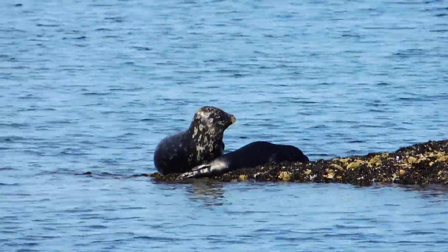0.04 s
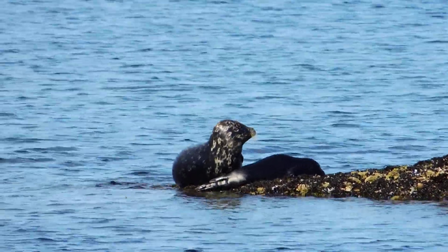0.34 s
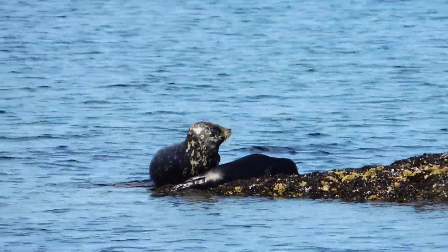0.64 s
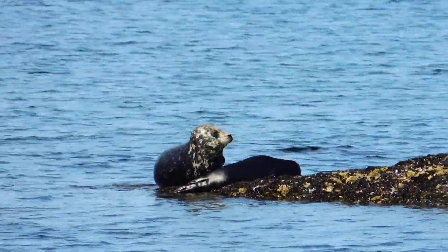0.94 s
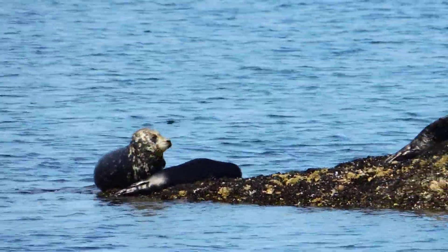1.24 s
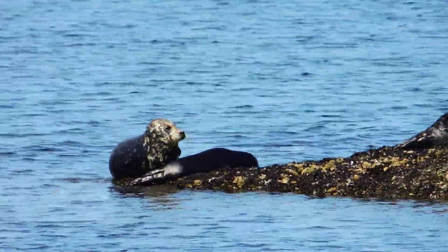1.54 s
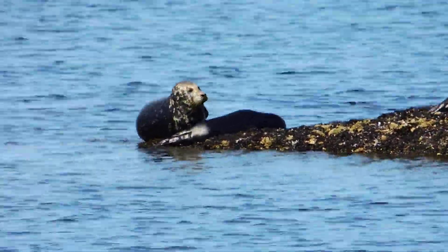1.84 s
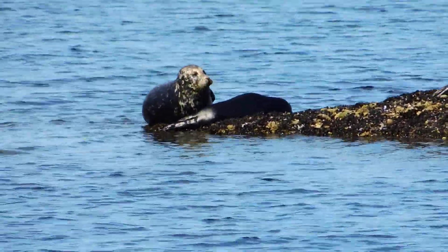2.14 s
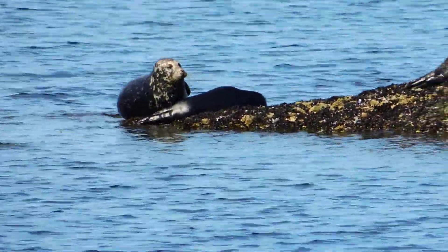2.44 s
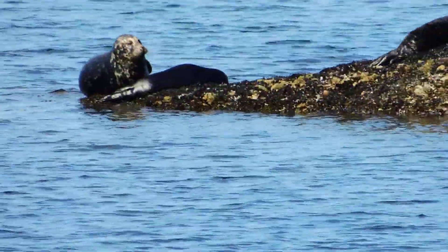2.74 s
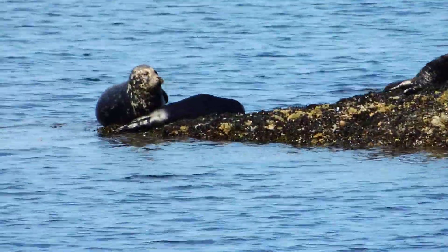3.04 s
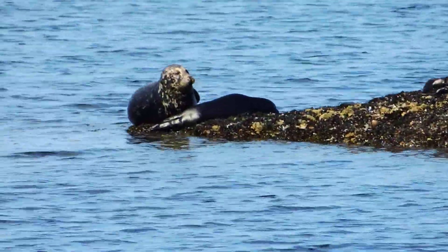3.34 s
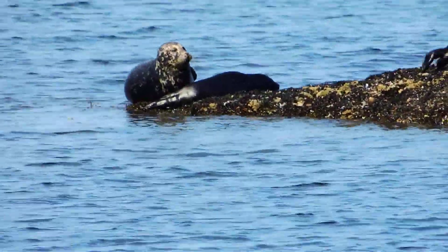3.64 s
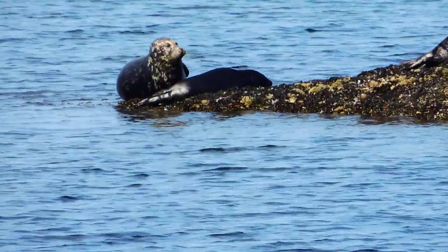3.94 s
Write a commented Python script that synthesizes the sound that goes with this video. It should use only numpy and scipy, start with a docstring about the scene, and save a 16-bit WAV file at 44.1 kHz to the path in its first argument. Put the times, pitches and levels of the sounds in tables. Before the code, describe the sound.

Gusty wind rumbles and thumps against the microphone on a rocky shore, mostly on the right side, easing briefly early on and then picking up. Faint high cricket chirps and a soft wash of water continue behind it.

```python
"""Gusty wind buffeting a camera's microphone ports on a calm rocky shore.
Eddies hit the exposed right port hard, the sheltered left one lightly; the stronger the gust,
the smaller its eddies and the higher the rumble reaches. Behind it: a faint wash of ripples,
two small splashes, crickets chirping in short wing strokes, and microphone hiss."""
import sys
import numpy as np
from scipy import signal
from scipy.fft import rfft, irfft, next_fast_len
from scipy.io import wavfile
from scipy.ndimage import uniform_filter1d, map_coordinates

SR = 44100
rng = np.random.default_rng(int(sys.argv[2]) if len(sys.argv) > 2 else 0)


def int16_out(signal):
    """Quantize to a 16-bit WAV file."""
    q = np.round(np.clip(np.atleast_2d(signal).T, -1, 1) * 32767)
    wavfile.write(sys.argv[1], SR, q.astype(np.int16))


N = 176400


def amp(db):
    """Decibels to gain."""
    return 10 ** (np.asarray(db) / 20)


def unit(x):
    """Scale to rms 1."""
    return x / np.sqrt(np.mean(x ** 2) + 1e-20)


def curve(rows):
    """(time [s], value) rows to one value per sample."""
    return np.interp(np.arange(N) / SR, *np.transpose(rows))


def wobble(knots_per_s):
    """Smooth random curve."""
    return map_coordinates(rng.standard_normal(8192), [np.arange(N) * knots_per_s / SR], mode="wrap")


def filtered(x, response):
    """Apply a gain given as a function of frequency [Hz]."""
    size = next_fast_len(N + 8192)
    return irfft(rfft(x, size) * response(np.fft.rfftfreq(size, 1 / SR)), size)[..., :N]


def coloured(x, spectrum):
    """Shape by (frequency [Hz], gain [dB]) rows; rms 1."""
    knots_hz, db = np.transpose(spectrum)
    return unit(filtered(x, lambda hz: amp(np.interp(np.log(hz + 1), np.log(knots_hz + 1), db))))


def noise_band(shape, centre_hz, sigma_oct):
    """Noise in a bell-shaped band; rms 1."""
    noise = rng.standard_normal(shape)
    return unit(filtered(noise, lambda hz: np.exp(-.5 * (np.log2((hz + 1) / centre_hz) / sigma_oct) ** 2)))


def even(x, window_s):
    """Level out swells slower than the window."""
    size = int(window_s * SR)
    power = np.abs(uniform_filter1d(uniform_filter1d(x ** 2, size), size))
    return x / np.sqrt(power + 1e-9)


def add(track, centre_s, sound):
    """Mix a sound into a track, centred on centre_s."""
    start = round(centre_s * SR) - sound.shape[-1] // 2
    first, end = max(start, 0), min(start + sound.shape[-1], N)
    if end > first:
        track[..., first:end] += sound[..., first - start:end - start]


# hiss spectrum (frequency [Hz], gain [dB])
HISS_SPECTRUM = [(100, 0), (3000, 0), (7000, 0), (14000, -.5)]
def microphone_hiss(level_db=-57):
    """Steady, near-white self-noise, independent per channel."""
    return amp(level_db) * coloured(rng.standard_normal((2, N)), HISS_SPECTRUM)


# wash spectrum (frequency [Hz], gain [dB])
WATER_SPECTRUM = [(100, -12), (400, 4.5), (700, 1.5), (1000, -2), (1600, -5.5), (2700, -8), (4000, -11),
                  (7000, -15), (14000, -19)]
def water(level_db=-53.5, patch_db=1, sway_db=0.44):
    """Ripples along the shore merge into a softly shifting wash."""
    spectrogram = signal.stft(rng.standard_normal((2, N)), nperseg=512)[2]
    patches = uniform_filter1d(rng.standard_normal(spectrogram.shape[1:]), size=6, axis=0)
    patches = unit(uniform_filter1d(patches, size=12, axis=1))
    wash = signal.istft(spectrogram * amp(patch_db * patches), nperseg=512)[1][:, :N]
    return amp(level_db + sway_db * wobble(3.0)) * coloured(wash, WATER_SPECTRUM)


# splashes at the rocks (time [s], pitch [Hz], level [dB], length [s])
ROCK_SPLASHES = [(1.055, 4770, -51, .004), (2.243, 1900, -52, .012)]
def splashes():
    """A ripple breaks on a rock: a brief, narrow noise burst."""
    out, t = np.zeros((2, N)), np.arange(N) / SR
    for time_s, hz, db, length_s in ROCK_SPLASHES:
        envelope = np.exp(-(2 * (t - time_s) / length_s) ** 2)
        out += amp(db) * envelope * noise_band((2, N), hz, sigma_oct=0.18)
    return out


# pitch slide in one stroke (pitch [Hz], mean fall [Hz])
STROKE_FALL = [(4200, 260), (5000, 750)]
def wing_stroke(pitch_hz, pan_db, length_s=.028, right_lead_rad=2.07):
    """One stroke is a short falling tone; higher crickets slide further."""
    t = np.arange(-SR // 40, SR // 40) / SR
    position = np.clip(t / length_s, -.5, .5)
    fall_hz = np.interp(pitch_hz, *np.transpose(STROKE_FALL))
    detune, slope = rng.normal(0, .06), rng.normal(1, .2)
    slide = detune - slope * position - .8 * position ** 2
    phase = 2 * np.pi * np.cumsum(pitch_hz + fall_hz * slide) / SR
    left = amp(pan_db / 2) * np.sin(phase)
    right = amp(-pan_db / 2) * np.sin(phase + right_lead_rad)
    return np.cos(np.pi * position) ** 2 * np.array([left, right])


def ground_echo(sound, t60_s=0.27, level_db=-7.5):
    """The ground scatters sound into a short diffuse tail."""
    age_s = np.arange(SR // 4) / SR
    tail = rng.standard_normal((2, len(age_s))) * amp(-60 * age_s / t60_s)
    tail /= np.linalg.norm(tail[0])
    return amp(level_db) * signal.fftconvolve(sound, tail, axes=1)[:, :N]


# near chirps (last stroke time [s], pitch [Hz], level [dB], left over right [dB])
NEAR_CHIRPS = [(.078, 4170, -52, 0), (.085, 4950, -47, 4), (.45, 4960, -49, 2), (.5, 4900, -54, 2),
               (.68, 4150, -54.5, -2), (.812, 4880, -49.5, 4), (.86, 5050, -55, 1), (1.255, 5020, -51.5, 1),
               (1.262, 4190, -51, 3), (1.675, 4830, -49.5, -1), (1.712, 5010, -47.5, 7),
               (1.772, 4170, -49, -1), (2.063, 4880, -49.5, 4), (2.207, 4200, -48, 1),
               (2.222, 5150, -54, 0), (2.437, 4950, -48.5, 5.5), (2.677, 4200, -53, 0),
               (2.712, 4920, -48.5, 5), (2.73, 5040, -51, 0), (3.115, 4170, -50, 2),
               (3.145, 5100, -52.5, 1), (3.32, 4960, -52, 2), (3.595, 5040, -51, -1), (3.615, 4930, -51, 6),
               (3.619, 4170, -48.5, 0), (3.945, 4950, -50.5, 5), (3.958, 4920, -50, 1)]
# far crickets (pitch [Hz], level [dB])
FAR_CRICKETS = [(4970, -56.5), (4660, -56.5), (4920, -56.5), (4450, -58.5), (4860, -56.5), (4980, -58)]
# successive strokes of a chirp (gain [dB])
STROKE_GAINS_DB = [-3, 0, -0.8]
def crickets(stroke_period_s=.045, far_period_s=.47, far_pan_db=4):
    """Three wing strokes make a chirp; the far crickets chirp loosely in turn."""
    chirps = list(NEAR_CHIRPS)
    for i, (hz, db) in enumerate(FAR_CRICKETS):
        cycles = np.arange(10) + i / len(FAR_CRICKETS) + rng.normal(0, 0.07, 10)
        chirps += [(far_period_s * cycle, hz, db, far_pan_db) for cycle in cycles]
    out = np.zeros((2, N))
    for last_s, hz, db, pan_db in chirps:
        first_s = last_s - stroke_period_s * (len(STROKE_GAINS_DB) - 1)
        for k, stroke_db in enumerate(STROKE_GAINS_DB):
            time_s = first_s + k * stroke_period_s + rng.normal(0, 0.0011)
            add(out, time_s, amp(db + stroke_db + rng.normal(0, 1)) * wing_stroke(hz, pan_db))
    return out + ground_echo(out)


# wind at the left port (time [s], level [dB])
LEE_WIND = [(0.0, -37), (0.08, -34), (0.2, -38.5), (0.29, -36.5), (0.4, -41), (0.51, -36), (0.65, -35.5),
            (0.75, -41), (0.93, -32), (1.07, -40), (1.12, -23.5), (1.17, -28), (1.32, -40.5), (1.42, -37.5),
            (1.47, -27), (1.54, -41), (1.64, -33.5), (1.92, -34), (2.03, -27), (2.08, -32), (2.29, -29),
            (2.35, -40), (2.5, -36), (2.54, -29), (2.85, -33.5), (2.94, -21.5), (3.13, -38.5), (3.28, -32),
            (3.36, -43), (3.41, -34), (3.56, -38), (3.76, -29), (3.8, -40), (4.0, -38)]
# its spectrum (frequency [Hz], gain [dB])
LEE_SPECTRUM = [(8, -10), (20, 3), (80, 3.5), (140, -1.5), (200, -3.5), (250, -10), (350, -21), (500, -34),
                (1000, -46), (3000, -100)]
def sheltered_rumble(gain_db=1.3, flutter_db=1.5):
    """Slower air at the left port gives a weaker, duller rumble."""
    rumble = even(coloured(rng.standard_normal(N), LEE_SPECTRUM), window_s=0.038)
    return amp(curve(LEE_WIND) + gain_db + flutter_db * wobble(50)) * rumble


# deep rumble at the right port (time [s], level [dB])
RUMBLE_SWELL = [(0.0, -15.5), (0.12, -30.5), (0.17, -28), (0.2, -24), (0.43, -32), (0.46, -27.5),
                (0.72, -31), (0.77, -19), (0.8, -26.5), (0.96, -18), (1.06, -22), (1.13, -14.5),
                (1.16, -26), (1.23, -13.5), (1.31, -30), (1.48, -17.5), (1.51, -32), (1.58, -11.5),
                (1.66, -18.5), (1.84, -16), (1.96, -24.5), (2.13, -13), (2.38, -23), (2.43, -15.5),
                (2.55, -31), (2.59, -19.5), (2.68, -19), (2.74, -29), (2.79, -16.5), (2.86, -32),
                (2.97, -17), (3.14, -25.5), (3.4, -20), (3.46, -25.5), (3.51, -17.5), (3.54, -29),
                (3.6, -13.5), (3.65, -24), (3.72, -16.5), (3.78, -28), (3.82, -21), (4.0, -20.5)]
# its spectrum (frequency [Hz], gain [dB])
RUMBLE_SPECTRUM = [(8, -13), (20, -5.5), (45, 2.5), (70, 1), (105, 0.5), (135, -6.5), (200, -15.5),
                   (500, -42), (2000, -100)]
def exposed_rumble(gain_db=-2.9, flutter_db=2):
    """Wind on the right port: a deep, swelling rumble."""
    level_db = curve(RUMBLE_SWELL) + gain_db + flutter_db * wobble(30)
    return amp(level_db) * even(coloured(rng.standard_normal(N), RUMBLE_SPECTRUM), window_s=0.062)


# hard eddies at the right port (time [s], frequency scale [Hz], peak before low-pass [dB])
HARD_EDDIES = [(.025, 215, -6), (.056, 125, -11), (.074, 168, -8.5), (.110, 182, -7.5), (.117, 160, -6.5),
               (.203, 119, -8), (.279, 243, -12.5), (0.771, 235, -9.5), (.955, 298, -9.5),
               (.979, 300, -14.5), (.995, 257, -11), (1.241, 254, -8), (1.479, 161, -9.5),
               (1.52, 307, -6.5), (1.592, 165, -8.5), (1.610, 225, -6), (1.677, 200, -5),
               (1.73, 160, -15.5), (1.789, 215, -10), (1.835, 161, -7), (1.851, 195, -8.5),
               (1.875, 307, -14), (1.93, 298, -8), (2.018, 165, -11), (2.176, 104, -12),
               (2.201, 290, -13.5), (2.293, 215, -6), (2.427, 285, -6), (2.7, 89, -6.5), (2.828, 48.7, -12),
               (3.006, 227, -10), (3.024, 198, -10), (3.186, 218, -11), (3.247, 272, -15.5),
               (3.264, 178, -7.5), (3.689, 376, -12.5), (3.715, 268, -13), (3.794, 181, -7),
               (3.806, 228, -6), (3.858, 225, -6.5), (3.884, 201, -7), (3.928, 222, -7), (3.968, 99, -6.5)]
def thumps(port_cutoff_hz=1150):
    """Each hard eddy is a pressure or suction spike between shallow troughs, rounded by the port."""
    out, t = np.zeros(N), np.arange(-SR // 25, SR // 25) / SR
    signs = rng.choice([-1, 1], len(HARD_EDDIES))
    for (time_s, hz, db), sign in zip(HARD_EDDIES, signs):
        offset_sq = (np.pi * hz * t) ** 2
        spike = (1 - 3 * offset_sq) / (1 + offset_sq) ** 3
        add(out, time_s, sign * amp(db) * spike)
    return filtered(out, lambda hz: 1 / np.hypot(1, (hz / port_cutoff_hz) ** 2))


# wind at the right port (time [s], strength [dB])
GUSTS = [(0.0, -19), (0.06, -18.5), (0.12, -19), (0.17, -28), (0.2, -21), (0.24, -33.5), (0.28, -23),
         (0.35, -36), (0.38, -29.5), (0.44, -36.5), (0.5, -28), (0.59, -35.5), (0.71, -36.5), (0.76, -20),
         (0.78, -26.5), (0.81, -30.5), (0.88, -43), (0.94, -19), (1.0, -16.5), (1.03, -29.5), (1.07, -28),
         (1.1, -19.5), (1.18, -20.5), (1.24, -22), (1.26, -32), (1.29, -33.5), (1.38, -26.5), (1.41, -35),
         (1.47, -22), (1.52, -17), (1.56, -24.5), (1.61, -14), (1.65, -22.5), (1.68, -19.5), (1.72, -19),
         (1.86, -17.5), (1.91, -25), (1.93, -19.5), (1.98, -15), (2.01, -22.5), (2.09, -16.5), (2.13, -23),
         (2.21, -17.5), (2.24, -23.5), (2.29, -25), (2.33, -26.5), (2.38, -27), (2.41, -19), (2.49, -22.5),
         (2.55, -42), (2.6, -23), (2.67, -28.5), (2.73, -33.5), (2.82, -28.5), (2.86, -36), (2.97, -21),
         (3.02, -16), (3.05, -25), (3.15, -27.5), (3.18, -18.5), (3.22, -24.5), (3.26, -16), (3.33, -25),
         (3.42, -21), (3.45, -29.5), (3.5, -18), (3.54, -26.5), (3.58, -22), (3.74, -20), (3.8, -14),
         (3.91, -22), (4.0, -18.5)]
# eddies, large to small (centre [Hz], full-gust level [dB], growth [dB/dB], flutter before evening [dB])
EDDY_BANDS = [(157, -21.6, 1.3, 4.5), (241.6, -24.5, 1.3, 4), (374, -30.3, 1.45, 5), (570, -37, 2.15, 7),
              (886, -52, 2.45, 10)]
def eddies(full_gust_db=-18):
    """Eddies buffet the right port, fluttering together; small ones grow fastest with the wind."""
    gust_db = curve(GUSTS) - full_gust_db
    flutter = np.clip(wobble(150), -2, 2)
    out = np.zeros(N)
    for hz, db, growth, flutter_db in EDDY_BANDS:
        band = noise_band(N, hz, sigma_oct=0.37) * amp(flutter_db * flutter)
        out += amp(db + growth * gust_db) * even(band, window_s=0.042)
    return out


def scene():
    """Wind on each port, over water, crickets and hiss."""
    left = sheltered_rumble()
    right = exposed_rumble() + eddies() + thumps()
    return np.array([left, right]) + water() + crickets() + microphone_hiss() + splashes()


def record(dry, band_limit_hz=14260):
    """The camera keeps nothing above its band limit."""
    return filtered(dry, lambda hz: hz < band_limit_hz)


dry = scene()
out = record(dry)
int16_out(out)
```